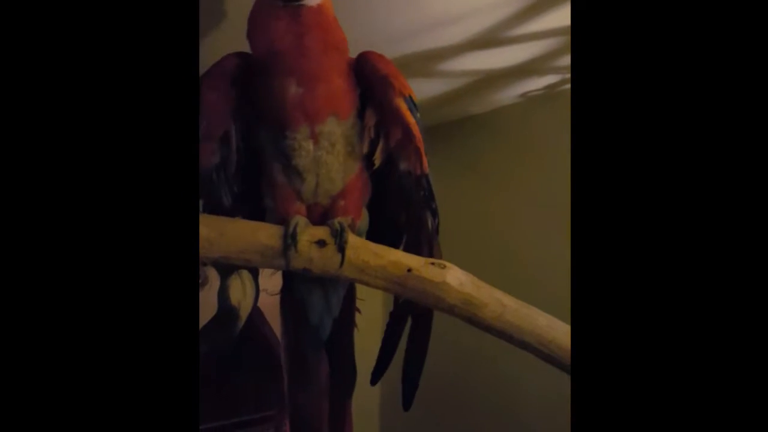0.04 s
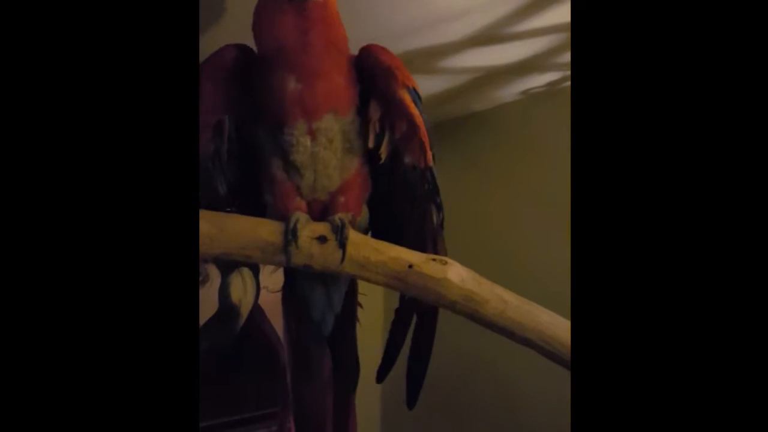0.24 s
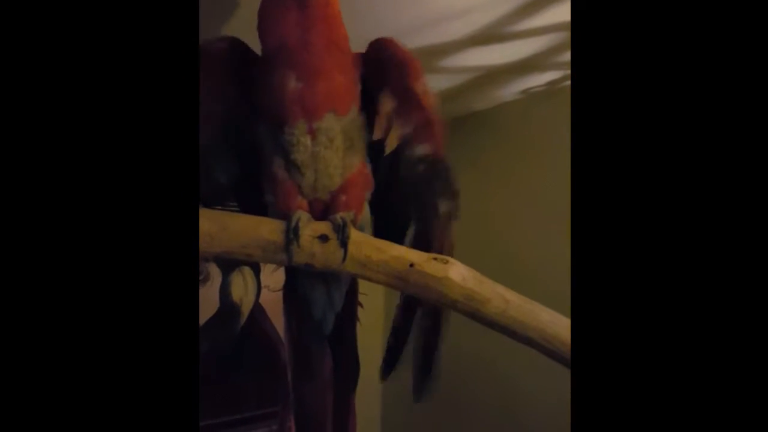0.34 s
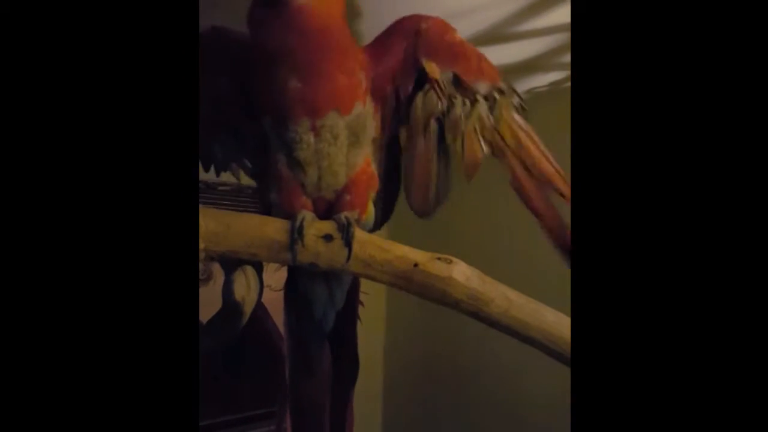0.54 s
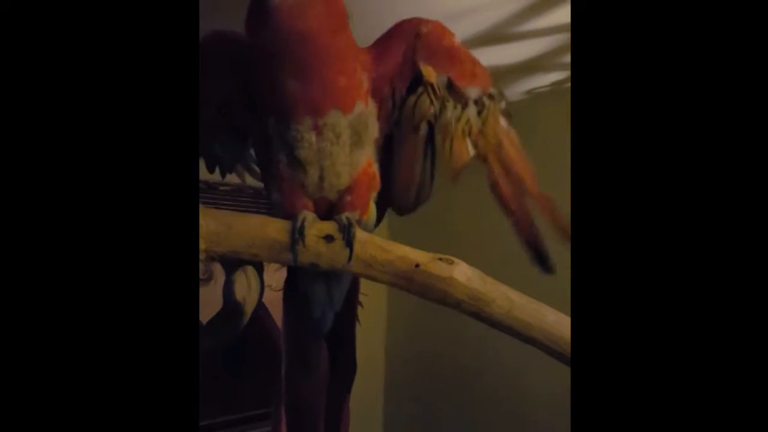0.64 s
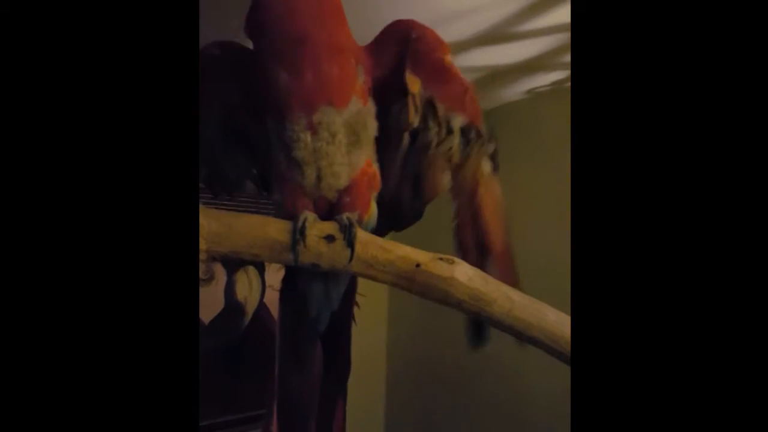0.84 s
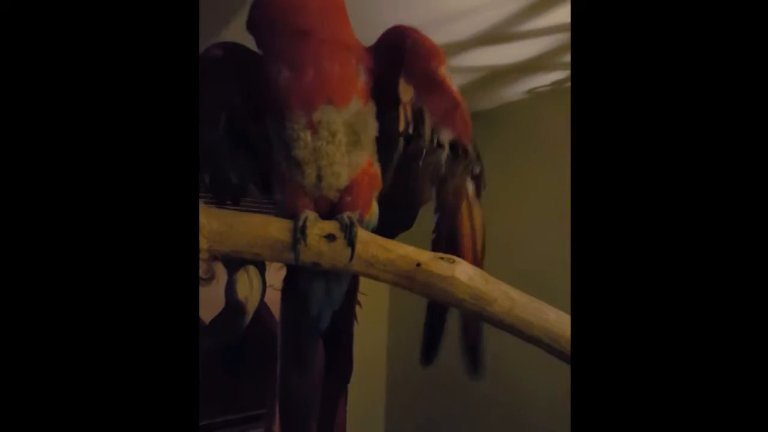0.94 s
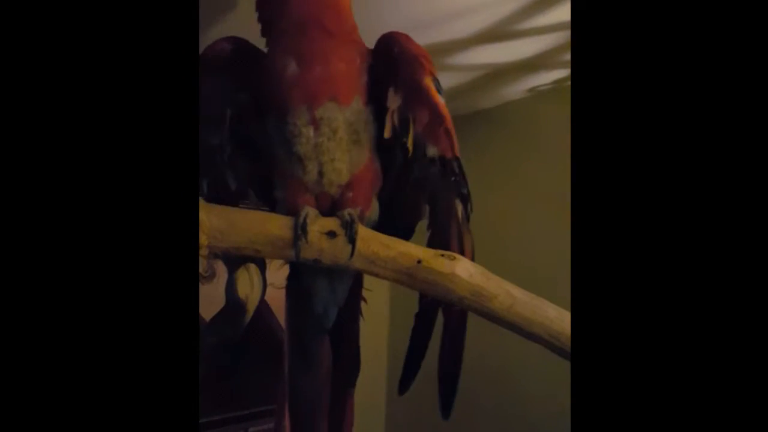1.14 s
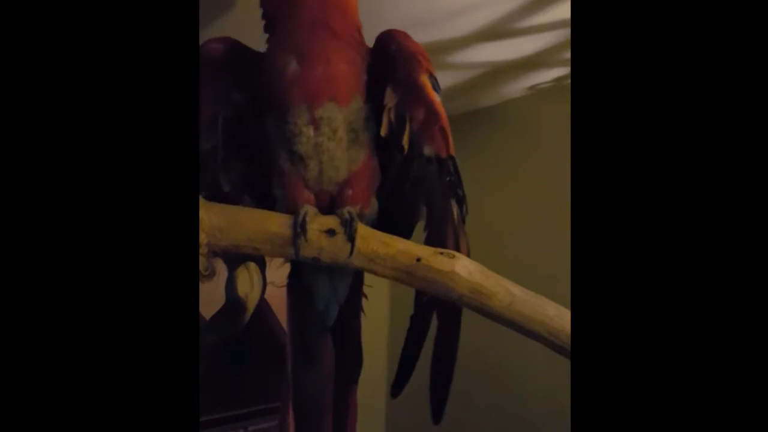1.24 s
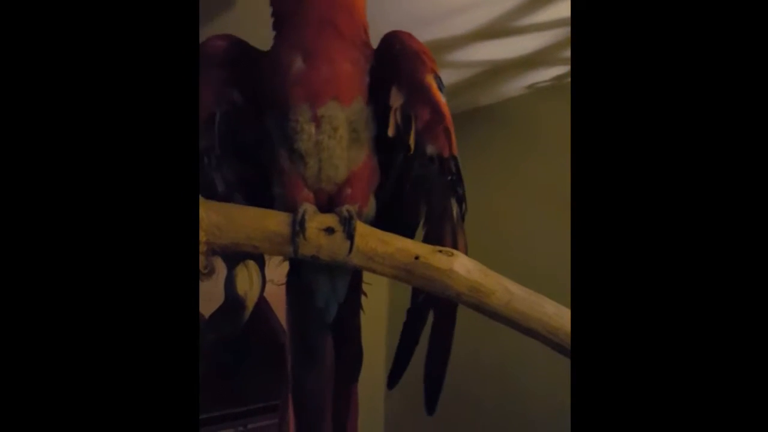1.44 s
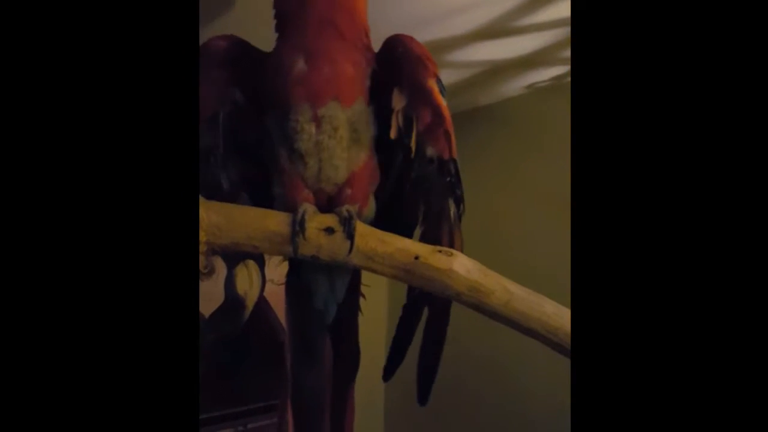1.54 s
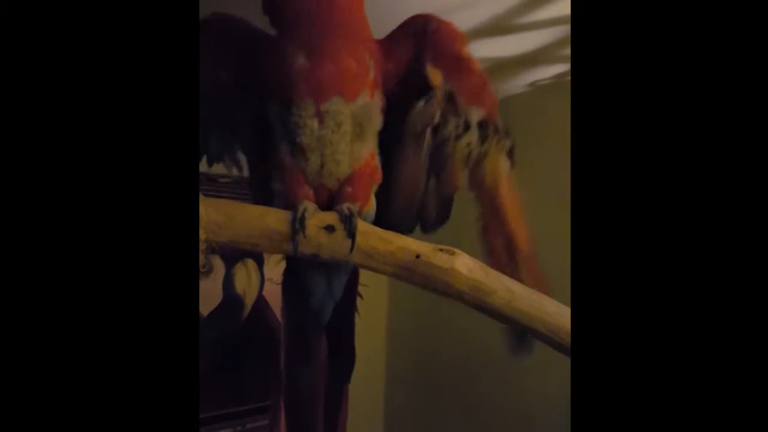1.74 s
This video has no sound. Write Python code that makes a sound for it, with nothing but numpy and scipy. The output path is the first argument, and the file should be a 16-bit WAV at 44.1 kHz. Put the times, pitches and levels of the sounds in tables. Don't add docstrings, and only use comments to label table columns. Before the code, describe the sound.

Short, rough parrot squawks in two groups, with tiny beak ticks, close up indoors over faint hum.

```python
import sys
import numpy as np
from scipy import signal
from scipy.fft import rfft, irfft, next_fast_len
from scipy.io import wavfile

SR = 44100
rng = np.random.default_rng(int(sys.argv[2]) if len(sys.argv) > 2 else 0)


def to_wav(sig):
    pcm = np.clip(np.atleast_2d(sig), -1, 1) * 32767
    pcm = np.round(pcm).astype(np.int16)
    wavfile.write(sys.argv[1], SR, pcm.T)


def natural_amplitude(level_db):
    exponent = np.asarray(level_db, float) / 20
    return 10 ** exponent


N = 79380


def at_hz(points, hz):
    table_hz, value = np.transpose(points)
    return np.interp(np.log(hz), np.log(table_hz), value)


def ring(clicks, hz, t60_s):
    radius, w = natural_amplitude(-60 / (t60_s * SR)), 2 * np.pi * hz / SR
    return signal.lfilter([0, np.sin(w)], [1, -2 * radius * np.cos(w), radius * radius], clicks + 1e-18)


def bands(white):
    edges_hz = 30 * 2 ** np.arange(0, 9.3, .5)
    for k, (low, high) in enumerate(zip(edges_hz, edges_hz[1:])):
        band = signal.butter(2, [low, high], "band", fs=SR, output="sos")
        yield np.sqrt(low * high), signal.sosfilt(band, white[k % 2])


def pair(mid, side, likeness):
    likeness = np.clip(likeness, 0, 1)
    return np.sqrt(1 + likeness) * mid + np.sqrt(1 - likeness) * side * [[1], [-1]]


def hum():
    # (frequency [Hz], density [dB per Hz])
    rumble_db = [(18, -48), (30, -20), (87, -3.5), (147, -14), (404, -15), (460, -18), (612, -29.5),
                 (953, -26), (15000, -44.5)]
    # (frequency [Hz], likeness [-1 to 1])
    rumble_likeness = [(60, 0.97), (240, 0.87), (950, 0.21), (3770, -0.06), (15000, 0.35)]
    # (time [s], level [dB])
    gain_drift = [(0, -66), (.2, -64.5), (0.452, -74.5), (0.699, -74), (1.0, -75), (1.25, -72),
                  (1.8, -70.5)]
    hum_db, motor_hz, motor_db = 5, 80.7, -5
    whine_hz, whine_db = 7628, -28

    t = np.arange(N) / SR
    rumble = 0
    for hz, (mid, side) in bands(rng.standard_normal((2, 2, N))):
        rumble = rumble + natural_amplitude(at_hz(rumble_db, hz)) * pair(mid, side, at_hz(rumble_likeness, hz))
    motor = ring(rng.standard_normal(N), motor_hz, 0.37)
    whine = natural_amplitude(whine_db) * np.sin(2 * np.pi * whine_hz * t) * [[1], [.2]]
    mix = rumble / rumble.std() + natural_amplitude(motor_db) * motor / motor.std() + whine
    drift_s, drift_db = np.transpose(gain_drift)
    return mix * natural_amplitude(hum_db + np.interp(t, drift_s, drift_db))


def pulse_trains(rows, count):
    most_pulses, jitter, spread_db = 8, .1, 2.0
    edge_loss_db, peak_at = 4.5, .4
    trains = np.zeros((count, N))
    for start_s, length_s, db, rate_hz, pipe_db in rows:
        gaps = rng.standard_normal(most_pulses)
        colour = rng.standard_normal((most_pulses, count))
        pulse_s = np.cumsum(np.r_[0, 1 + jitter * gaps[1:]]) / rate_hz
        alive = np.clip((length_s - pulse_s) * rate_hz * 2 + 1, 0, 1)
        from_peak = np.clip(pulse_s / length_s / peak_at - 1, -1, 1)
        level_db = db - edge_loss_db * from_peak ** 2
        sizes = (alive * natural_amplitude(level_db))[:, None] * natural_amplitude(spread_db * colour)
        sizes[:, 0] *= natural_amplitude(pipe_db)
        trains[:, ((start_s + pulse_s) * SR).astype(int)] += sizes.T
    return trains


def croaks(rows, throat):
    rasp_db, rasp_s, rasp_db_per_octave, rasp_likeness = -19, .001, 4.0, 0.62
    thump_db, thump_hz = -38, 220
    voice_low_hz = 400

    air = pair(*rng.standard_normal((2, N)), rasp_likeness)
    trains = pulse_trains(rows, len(throat))
    puffs = signal.lfilter([1], [1, -np.exp(-1 / (rasp_s * SR))], trains)
    voice = 0
    for k, (hz, t60_s, db, pan_db) in enumerate(throat):
        breath = natural_amplitude(rasp_db + rasp_db_per_octave * np.log2(hz / 2000)) * air * puffs[k]
        level = natural_amplitude(db + pan_db * np.array([[.5], [-.5]]))
        voice = voice + (-1) ** k * ring(trains[k] + breath, hz, t60_s) * level
    voice = signal.sosfilt(signal.butter(4, voice_low_hz, "high", fs=SR, output="sos"), voice)
    return voice + natural_amplitude(thump_db) * ring(trains[1], thump_hz, 6.0 / thump_hz)


def parrot():
    # (start [s], length [s], level [dB], pulse rate [Hz], windpipe ring
    # [dB])
    tick_early = [
        (.0895, .001, -32, 330, 0),
    ]
    call_1 = [
        (.2375, .017, -4.5, 266, 3),
        (.2648, .013, -2.5, 260, -9.5),
        (.2965, 0.0027, -10, 270, 4.5),
    ]
    call_2 = [
        (.4042, 0.0024, -8.5, 350, 11),
        (.4300, 0.0095, -10, 400, 0),
        (.4600, 0.0087, -35, 280.7, 8),
    ]
    call_3 = [
        (.5674, 0.00605, -16.5, 400, 1),
        (.5897, 0.016, -8, 327.3, -2),
        (.6242, 0.0034, -4.5, 308.6, -2.5),
    ]
    ticks_late = [
        (1.2867, .001, -37, 330, 0.0093),
        (1.6857, .001, -31, 330, 0.014),
    ]
    call_4 = [
        (1.3340, .011, -7.5, 370.7, -4),
        (1.3577, 0.013, -7.5, 324, -10),
        (1.3785, 0.011, -12, 337, -2),
        (1.4520, .016, -7, 205.9, -2.5),
        (1.4774, 0.0052, -5, 350, -2),
    ]
    call_5 = [
        (1.7102, 0.00585, -18, 310, 0),
        (1.7378, 0.01, -35.5, 250, 3.5),
    ]
    # (frequency [Hz], t60 [s], level [dB], left minus right [dB])
    beak_early, beak_late = [(1540, 0.011, -6, 3.5), (2699, 0.027, -6.5, -7.5), (4050, 0.0067, -16, -3),
                             (7000, 0.0035, -21, -2), (8300, 0.0051, -23.5, 1)], [(2370, 0.017, -2, 0), (500, .015, -30, 0),
                                                 (3800, 0.0077, -4.5, 0), (5900, .004, -26, 0.0048),
                                                 (8300, .004, -23, 0.0074)]
    throat_1 = [(880, 0.039, -19, 1), (490, .012, -25, 2), (1145, 0.013, -15, -14), (1600, 0.019, -3.5, 1),
                (2050, .008, -5, -2.5), (2726, 0.045, -7.5, -7), (3414, 0.023, -10.5, 11.5),
                (4300, 0.011, -13.5, -4.5)]
    throat_2 = [(910, 0.044, -25.5, 0), (520, 0.016, -30, 3), (1010, .02, -13.5, 0), (1542, .012, -4.5, 2),
                (2050, 0.0034, -9, -5), (2595, 0.0097, -7, -5.5), (3170, 0.0045, -4, 5.5),
                (4120, 0.01, -13, -1.5)]
    throat_3 = [(772.3, 0.082, -19.5, 1.5), (487, 0.05, -33.5, 6), (1132, 0.0097, -17, -6),
                (1547, 0.011, -5, 1.5), (1978, 0.00818, -8.5, 1), (2690, 0.01, -3.5, -4),
                (3233, 0.0052, -7, 1), (3915, 0.0045, -9, -1)]
    throat_4 = [(787.6, 0.069, -17.5, 6.5), (460, 0.031, -32.5, 2.5), (1019, 0.0061, -18, -13.5),
                (1488, 0.012, -5, -4), (1950, 0.012, -1, -1.5), (2575, 0.017, -2.5, 4),
                (3335, 0.023, -15, -6.5), (4080, 0.0035, -5.5, 3.5)]
    throat_5 = [(726.7, .11, -13.5, 3), (350, 0.012, -16, 8.5), (1140, 0.0098, -12, -1),
                (1498, 0.015, 0.5, -4), (2265, 0.0085, -0.5, -2), (2590, 0.0152, 1, 2.5),
                (3310, 0.011, -11, -3.5), (3816, .007, -8.5, 1)]
    upper_early = [(4926, 0.015, -22.5, 13), (7000, 0.006, -27.5, -0.5), (8400, 0.0035, -23, 2),
                   (11000, 0.0025, -34, -6.5), (13500, .002, -48, -2)]
    upper_late = [(5920, 0.0079, -19.5, 4), (6930, 0.0044, -24, -4.5), (8740, 0.0053, -25.5, 0.5),
                  (10130, 0.0014, -24.5, -1), (13300, 0.0029, -51, 1)]
    upper_last = [(4520, 0.0083, -22.5, 0.019), (6780, .005, -23, 0.016), (9060, 0.0028, -26, 0),
                  (11900, 0.0027, -38, 0)]
    dips_hz = (5200, 5400, 9700)
    dip_width_hz = 500

    bird = croaks(call_1, throat_1 + upper_early)
    bird = bird + croaks(call_2, throat_2 + upper_early)
    bird = bird + croaks(call_3, throat_3 + upper_early)
    bird = bird + croaks(call_4, throat_4 + upper_late)
    bird = bird + croaks(call_5, throat_5 + upper_last)
    bird = bird + croaks(tick_early, beak_early)
    bird = bird + croaks(ticks_late, beak_late)
    for hz in dips_hz:
        bird = signal.lfilter(*signal.iirnotch(hz, hz / dip_width_hz, fs=SR), bird)
    return bird


def room(x):
    # (frequency [Hz], t60 [s])
    room_t60 = [(300, 0.14), (800, 0.19), (1500, 0.17), (3000, 0.16), (6000, 0.15), (9000, 0.15),
                (13000, 0.055)]
    room_db, room_likeness = -29, .65
    late_db, late_stretch = -20, 2.0
    onset_s, early = .019, .3

    t = np.arange(SR // 2) / SR
    tail = 0
    for hz, (mid, side) in bands(rng.standard_normal((2, 2, len(t)))):
        fall_db = -60 * t / at_hz(room_t60, hz)
        decay = natural_amplitude(fall_db) + natural_amplitude(late_db + fall_db / late_stretch)
        tail = tail + pair(mid, side, room_likeness) * decay
    swell = 1 - (1 - early) * np.exp(-(t / onset_s) ** 4)
    tail = tail * swell * (t > .002)
    return natural_amplitude(room_db) * signal.fftconvolve(x, tail, axes=1)[:, :N]


def right_port(x):
    # (frequency [Hz], lag [rad])
    right_lag = [(0, 1), (700, -0.12), (1500, 3.0), (2930, 5.5), (4310, 8.5), (6460, 10), (8100, 12),
                 (15200, 29)]
    size = next_fast_len(N + 512)
    lag_rad = np.interp(np.fft.rfftfreq(size, 1 / SR), *np.transpose(right_lag))
    return irfft(rfft(x, size) * np.exp(-1j * lag_rad), size)[:N]


def scene():
    bird = parrot()
    bird = bird + room(bird)
    return np.array([bird[0], right_port(bird[1])]) + hum()


def top_cut(x):
    return signal.sosfilt(signal.butter(12, 15590, fs=SR, output="sos"), x)


def record(dry):
    top, out_gain = 1.05, .93
    cutoff_hz, mic_low_hz = 15500, 55
    mix = top * np.tanh(dry / top)
    mix = signal.sosfilt(signal.cheby2(10, 60, cutoff_hz, fs=SR, output="sos"), mix)
    mix = signal.sosfilt(signal.butter(2, mic_low_hz, "high", fs=SR, output="sos"), mix)
    return top_cut(out_gain * mix)


dry = scene()
out = record(dry)
to_wav(out)
```